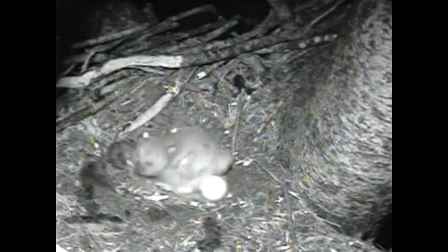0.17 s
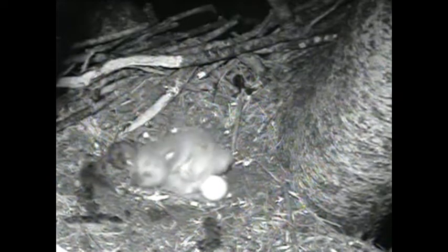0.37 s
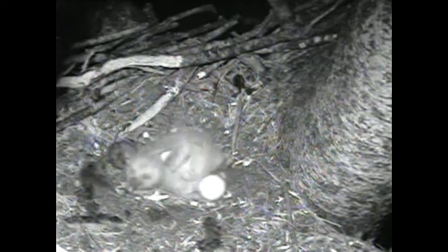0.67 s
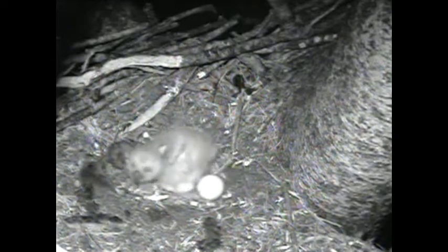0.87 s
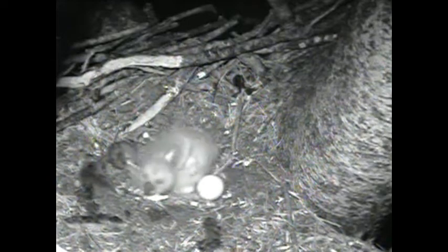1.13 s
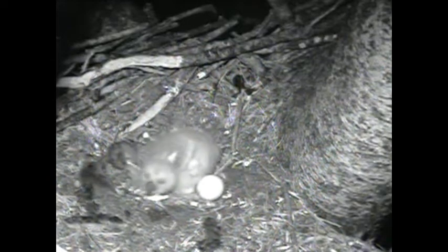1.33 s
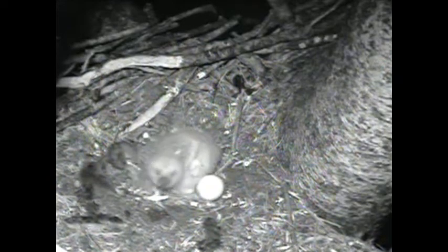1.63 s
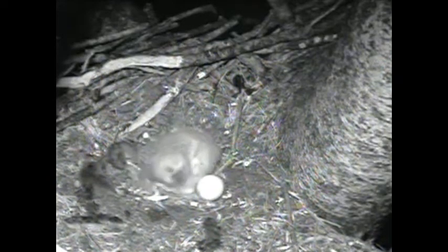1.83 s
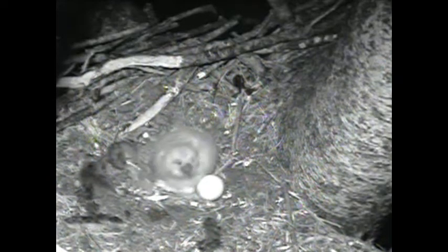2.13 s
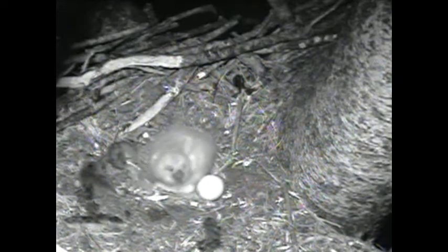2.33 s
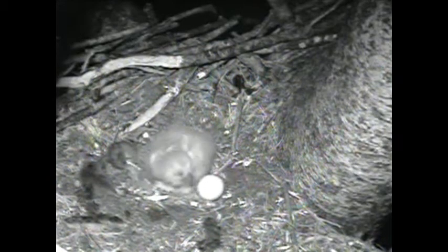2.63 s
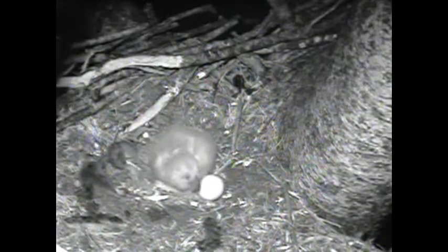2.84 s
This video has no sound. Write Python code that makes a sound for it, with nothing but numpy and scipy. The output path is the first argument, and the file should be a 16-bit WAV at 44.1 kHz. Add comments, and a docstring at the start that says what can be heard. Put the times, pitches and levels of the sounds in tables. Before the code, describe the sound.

An owl hoots four short times, then once longer, over a faint night hiss.

```python
"""A boxy low murmur and a hiss with mains buzz in its treble surround an owl's nest at night.
Chicks click and peep in tiny falling tones, with faint rustling. An adult close by gives four short
hoots and one long, double-swelled one: harmonic tones whose fundamental grows as the pitch nears
the throat resonance. Then something bumps the nest and rings two damped modes of its hollow.
The small microphone loses the bass of these nearby sounds."""
import sys
import numpy as np
from scipy import signal
from scipy.fft import rfft, irfft
from scipy.io import wavfile
from scipy.ndimage import uniform_filter1d

SR = 44100
rng = np.random.default_rng(int(sys.argv[2]) if len(sys.argv) > 2 else 0)


def digitize_waveform(pressure):
    """Quantize a signal to 16-bit integers and store it at the path in sys.argv[1].

    Rows of a 2-D input are taken as channels; values are limited to [-1, 1].
    """
    field = np.atleast_2d(pressure).T
    bounded = np.clip(field, -1, 1)
    quanta = np.round(bounded * 32767).astype(np.int16)
    wavfile.write(sys.argv[1], SR, quanta)


N = 132300

# Background spectrum. Each row: frequency in Hz, relative spectral density in dB.
BACKGROUND_SPECTRUM = [(15, -69), (25, -42), (91, -44.5), (189, -25.5), (327, -7.5), (399, -0.5), (441, 0),
                       (538, -1), (641, -4.5), (1060, -16.5), (2290, -18.5), (3580, -22.5), (4370, -26),
                       (7770, -26), (9720, -40), (12600, -70.5), (21400, -120)]
# Background drift. Each row: time in seconds, overall level in dB, relative murmur boost in dB.
BACKGROUND_LEVELS = [(0.0, -54, -1), (.5, -53, 0.5), (1.0, -51, 2), (1.57, -50.5, -1.5), (2.05, -51.5, 0),
                     (2.4, -51, -1), (3.0, -51.5, -2.5)]
# Crackles in a mains cycle. Each row: place in the cycle from 0 to 1, boost in dB at BUZZ_REF_HZ.
MAINS_CRACKLES = [(.075, 3.5), (.225, 3), (.735, 5.5)]
# Chick calls. Each row: start in seconds, main tone's peak in dB, first and last pitch in Hz,
# length in seconds.
CHICK_PEEPS = [(0.105, -48.5, 2300, 2200, 0.0039), (0.2899, -31.5, 2220, 2200, 0.0052),
               (0.461, -52, 2250, 2200, 0.021), (2.135, -54, 2290, 2210, .012),
               (2.173, -57, 3880, 3500, 0.0072), (2.209, -57.5, 2294, 2230, 0.014),
               (2.396, -50, 3860, 2990, 0.006), (2.445, -50.5, 3850, 3100, 0.005)]
# Rustles. Each row: start and length in seconds, centre and bandwidth in Hz, level in dB.
RUSTLE_PATCHES = [(.245, .24, 2260, 200, -64), (.3, .2, 1450, 800, -64), (.43, .05, 2850, 400, -66),
                  (.45, .03, 1500, 350, -61), (2.09, .15, 2900, 1800, -65)]
# Pitch arches. Each row: start and length in seconds, top pitch in Hz, place of the top from 0 to 1,
# squareness of the arch, level in dB.
SHORT_HOOTS = [(.28, .126, 320, .47, 2.8, -39), (.423, .099, 316, .51, 2.8, -38),
               (.549, .085, 289, .5, 2.3, -37), (.659, .076, 253, .56, 2.2, -37)]
# Course of the long hoot. Each row: time in seconds, pitch in Hz, level in dB.
LONG_HOOT_CONTOUR = [(.982, 200, -60), (.994, 228, -45), (1.006, 264, -37), (1.02, 304, -38),
                     (1.04, 319, -35.5), (1.07, 318, -36), (1.092, 312, -34.5), (1.12, 303, -37),
                     (1.134, 310, -38.5), (1.147, 327, -38), (1.16, 332, -37.5), (1.176, 329, -37),
                     (1.19, 313, -35), (1.204, 288, -36), (1.226, 234, -38.5), (1.234, 216, -46),
                     (1.25, 204, -46), (1.266, 188, -49), (1.28, 180, -62)]
# Throat resonance. Each row: pitch in Hz, fundamental relative to the second harmonic in dB.
THROAT_RESPONSE = [(180, -36), (230, -28), (255, -18), (283, -11), (300, -5.5), (315, -1), (329, 3.5)]
# Blows on the nest. Each row: start in seconds, upper mode's peak in dB, rise time and 60 dB decay
# time in seconds, lower mode relative to the upper in dB.
NEST_BUMPS = [(1.464, -46, .01, .07, -8), (1.5, -43, .003, .2, -1), (1.933, -47, .003, .08, -10),
              (2.461, -40.5, .012, .06, -16), (2.478, -56, .005, .07, 8)]

MURMUR_TOP_HZ, MURMUR_FLICKER_DB, BAND_FLICKER_DB = 800, 1.3, .83
MAINS_HZ, CRACKLE_WIDTH_CYCLES, BUZZ_REF_HZ = 60, .035, 6500
PARTIAL_RATIO, PARTIAL_DB, RING_DB, RING_T60_S = 1.19, -10, -19, .12
HOOT_EDGE_HZ, ATTACK_S, RELEASE_S = 186, .018, .015
THIRD_HARMONIC_DB, WAVER_HZ, SHIMMER_DB = -33, 1.5, .4
NEST_MODES_HZ, MODE_SAG, SCUFF_WIDTH_HZ, SCUFF_DB = (353.5, 525), .06, 120, -11
BASS_CUT_HZ, TOP_CUT_HZ, SELF_NOISE_DB = 150, 9873, -100


def amp(db):
    """Amplitude grows tenfold for every 20 dB."""
    return 10 ** (np.asarray(db) / 20)


def unit(x):
    """Division by the RMS gives unit power."""
    return x / np.sqrt(np.mean(x ** 2))


def band(x, hz, width_hz):
    """A resonant filter passes the frequencies near its centre."""
    edges = [hz - width_hz / 2, hz + width_hz / 2]
    return signal.sosfilt(signal.butter(2, edges, "bandpass", fs=SR, output="sos"), x)


def wander(rate_hz):
    """Random steps, smoothed twice, give a slow fluctuation of unit RMS."""
    hold = int(SR / rate_hz)
    steps = np.repeat(rng.standard_normal(N // hold + 1), hold)
    return unit(uniform_filter1d(uniform_filter1d(steps, hold), hold)[:N])


def murmur_and_hiss(t):
    """Amplitude modulation: noise bands flicker independently, and the mains pulses the treble."""
    freqs = np.fft.rfftfreq(N, 1 / SR) + 1
    hz, db = np.array(BACKGROUND_SPECTRUM).T
    spectrum = rfft(rng.standard_normal(N)) * amp(np.interp(np.log(freqs), np.log(hz), db))
    cycle = t * MAINS_HZ % 1
    buzz_db = sum(boost * np.exp(-((cycle - place) / CRACKLE_WIDTH_CYCLES) ** 2)
                  for place, boost in MAINS_CRACKLES)
    times, level_db, boost_db = np.array(BACKGROUND_LEVELS).T
    out = np.zeros(N)
    for k in range(30):  # half-octave bands
        centre_hz = 2 ** (k / 2)
        noise = irfft(spectrum * np.clip(1 - np.abs(2 * np.log2(freqs) - k), 0, 1), N)
        buzz_depth = min(centre_hz / BUZZ_REF_HZ, 1.3) ** 2
        buzz = unit(amp(buzz_depth * buzz_db))
        flicker = amp(BAND_FLICKER_DB * wander(8.91))
        murmur_db = np.interp(t, times, boost_db) + MURMUR_FLICKER_DB * wander(14)
        out += noise * flicker * buzz * amp(murmur_db * (centre_hz < MURMUR_TOP_HZ))
    return unit(out) * amp(np.interp(t, times, level_db))


def chicks(t):
    """Linear chirps with a fading upper partial and a short ring; the briefest are heard as clicks."""
    out = np.zeros(N)
    for start, db, from_hz, to_hz, length in CHICK_PEEPS:
        progress = np.clip((t - start) / length, 0, 1)
        phase = 2 * np.pi * length * (from_hz * progress + (to_hz - from_hz) * progress ** 2 / 2)
        partial = amp(PARTIAL_DB) * (1 - progress) * np.sin(PARTIAL_RATIO * phase)
        envelope = np.sin(np.pi * progress).clip(0) ** .57
        out += amp(db) * envelope * (np.sin(phase) + partial)
        after = t - start - length
        ring = amp(db + RING_DB - 60 * np.abs(after) / RING_T60_S) * (after > 0)
        out += ring * np.sin(2 * np.pi * to_hz * after)
    return out


def rustling(t):
    """Random modulation gives patches of band-limited noise a grainy texture."""
    out = np.zeros(N)
    for start, length, hz, width_hz, db in RUSTLE_PATCHES:
        grains = rng.standard_normal(N) * amp(1.5 * wander(70))
        progress = np.clip((t - start) / length, 0, 1)
        envelope = np.sin(np.pi * progress).clip(0) ** .25 * (t < start + length)
        out += amp(db) * envelope * unit(band(grains, hz, width_hz))
    return out


def owl_voice(pitch):
    """Source and filter: the second harmonic leads until the fundamental nears the throat resonance."""
    pitch = pitch + WAVER_HZ * wander(60)
    phase = 2 * np.pi * np.cumsum(pitch) / SR
    fundamental = amp(np.interp(pitch, *np.array(THROAT_RESPONSE).T)) * np.cos(phase)
    tone = fundamental + np.cos(2 * phase) + amp(THIRD_HARMONIC_DB) * np.cos(3 * phase)
    return np.sqrt(2) * amp(SHIMMER_DB * wander(89.3)) * tone


def owl_hoots(t):
    """Frequency and amplitude modulation shape one voice into four arches and a long double swell."""
    times, hz, db = np.array(LONG_HOOT_CONTOUR).T
    pitch = uniform_filter1d(np.interp(t, times, hz), size=400)
    gain = amp(np.interp(t, times, db)) * (t > times[0]) * (t < times[-1])
    for start, length, top_hz, top, squareness, level_db in SHORT_HOOTS:
        on = (t > start) & (t < start + length)
        age = t[on] - start
        progress = age / length
        from_top = np.where(progress < top, 1 - progress / top, (progress - top) / (1 - top))
        pitch[on] = top_hz - (top_hz - HOOT_EDGE_HZ) * from_top ** squareness
        ramp = np.clip(np.minimum(age / ATTACK_S, (length - age) / RELEASE_S), 0, 1)
        gain[on] = amp(level_db) * np.sin(np.pi / 2 * ramp) ** 1.4
    return gain * owl_voice(pitch)


def nest_bumps(t):
    """Dull blows excite two damped modes of the hollow, each sagging in pitch and blurred by a scuff."""
    out = np.zeros(N)
    for start, db, rise, t60, lower_db in NEST_BUMPS:
        age = np.clip(t - start, 0, None)
        envelope = (1 - np.exp(-age / rise)) ** 2 * amp(-60 * age / t60)
        envelope /= envelope.max()
        for hz, mode_db in zip(NEST_MODES_HZ, (lower_db, 0)):
            mode = np.sin(2 * np.pi * hz * age * (1 - MODE_SAG * age / t60))
            scuff = amp(SCUFF_DB) * unit(band(rng.standard_normal(N), hz, SCUFF_WIDTH_HZ))
            out += amp(db + mode_db) * envelope * (mode + scuff)
    return out


def scene():
    """Superposition at one small microphone: the nearby sounds, high-passed, add to the background."""
    t = np.arange(N) / SR
    near = owl_hoots(t) + chicks(t) + rustling(t) + nest_bumps(t)
    bass_cut = signal.butter(2, BASS_CUT_HZ, "highpass", fs=SR, output="sos")
    return (signal.sosfilt(bass_cut, near) + murmur_and_hiss(t))[None]


def record(dry):
    """Band limiting: a steep low-pass cuts the top, then the converter adds its own faint noise."""
    top_cut = signal.ellip(10, .2, 70, TOP_CUT_HZ, fs=SR, output="sos")
    return signal.sosfilt(top_cut, dry) + amp(SELF_NOISE_DB) * rng.standard_normal(dry.shape)


dry = scene()
out = record(dry)
digitize_waveform(out)
```